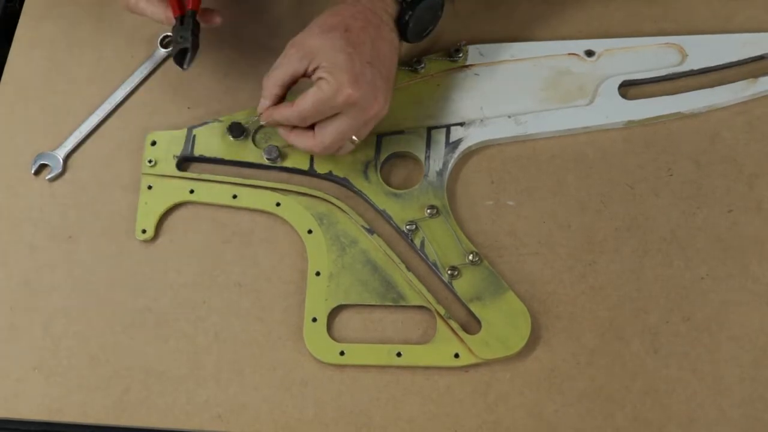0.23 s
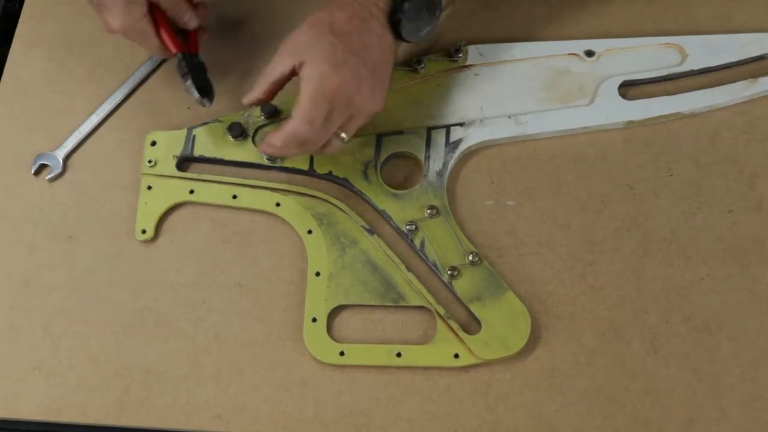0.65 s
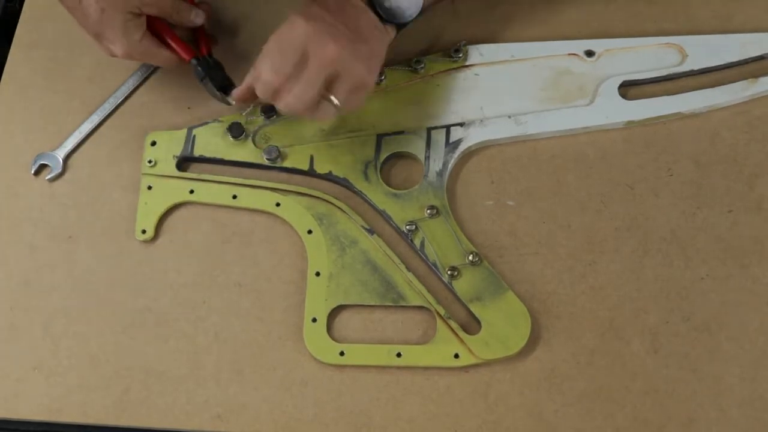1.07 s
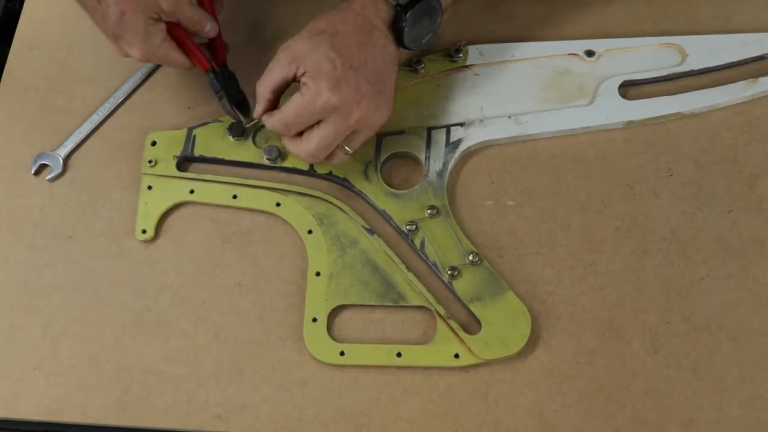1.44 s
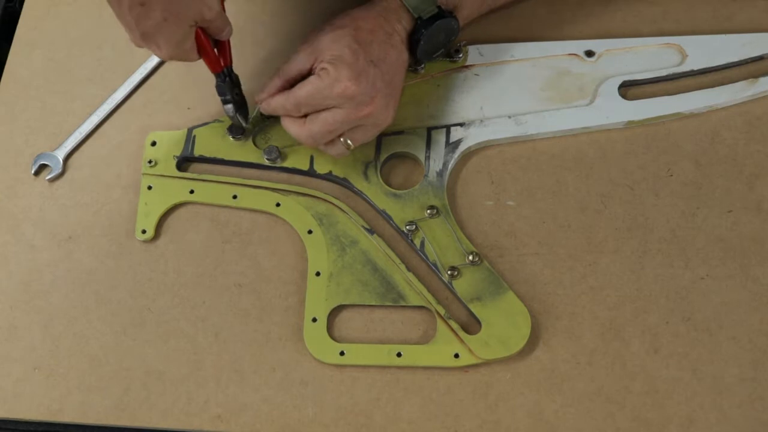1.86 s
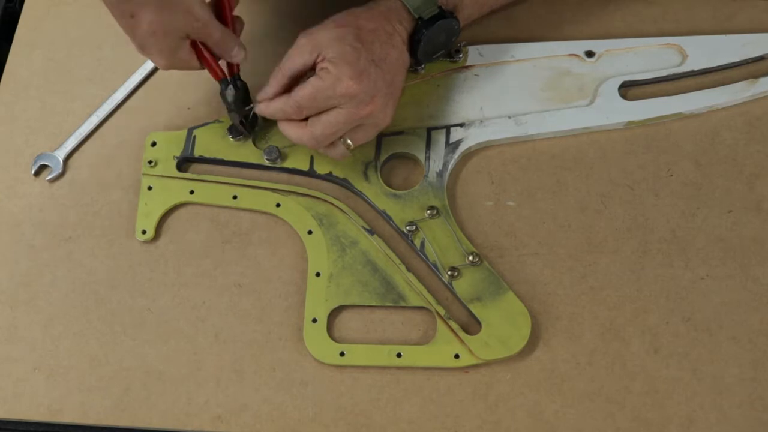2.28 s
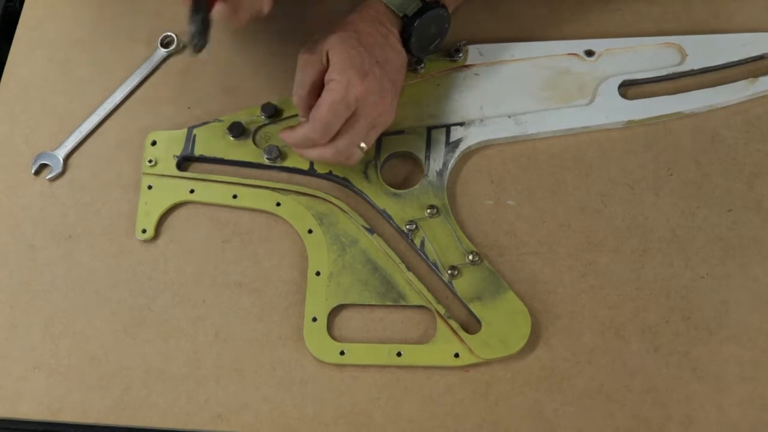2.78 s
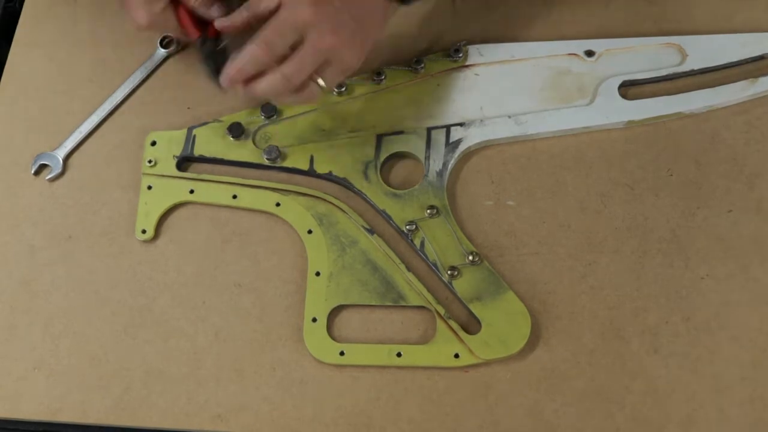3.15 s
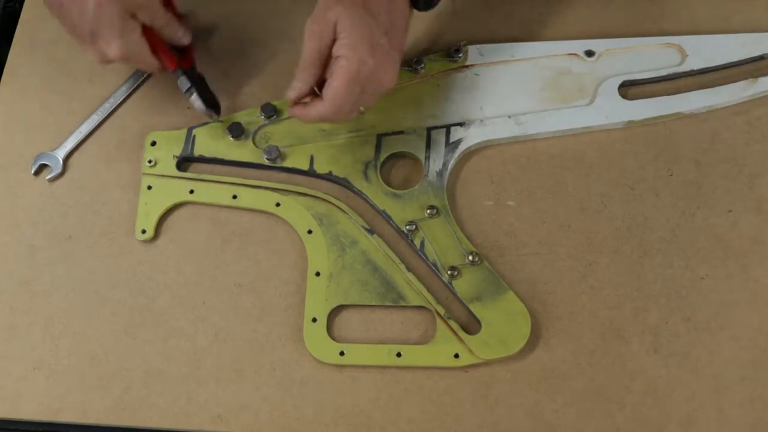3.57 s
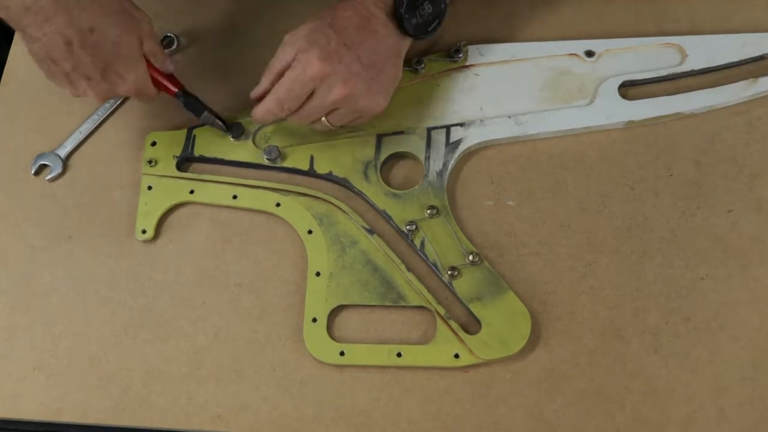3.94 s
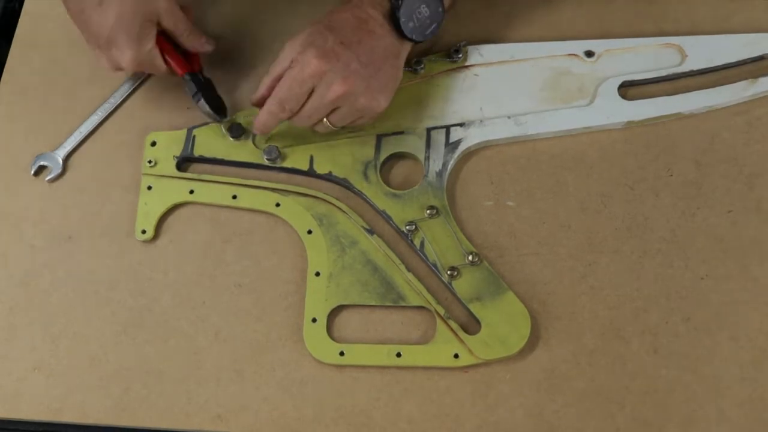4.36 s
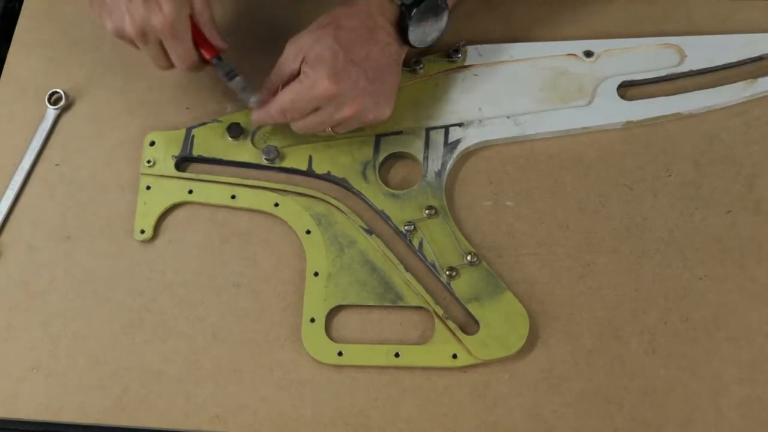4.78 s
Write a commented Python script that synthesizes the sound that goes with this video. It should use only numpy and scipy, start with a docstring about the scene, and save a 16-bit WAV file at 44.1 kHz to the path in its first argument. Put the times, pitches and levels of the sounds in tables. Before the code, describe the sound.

Quiet taps and rubbing of a cutter on a metal plate, one sharp wire snip, a knock, then a spanner clattering on a wooden bench.

```python
"""Over a faint hum and hiss, fingers and cutter jaws tap and rub on a metal plate on a wooden workshop bench.
The locking wire on its bolts squeaks by stick and slip, then parts with one sharp snip: bursts plus ringing modes.
The cutters knock on the plate; a hand shoves a spanner, which slides and clatters over the bench, ringing.
Last, dragged wire rasps and snags. Contacts are bursts of coloured noise, friction is a hail of tiny catches;
all of the bench work is heard with early and diffuse reflections."""
import sys
import numpy as np
from scipy import signal
from scipy.fft import rfft, irfft, next_fast_len
from scipy.io import wavfile
from scipy.ndimage import uniform_filter1d

SR = 44100
rng = np.random.default_rng(int(sys.argv[2]) if len(sys.argv) > 2 else 0)


def generate_wav(signal):
    """Clip the signal to [-1, 1] and save it as 16-bit WAV at the path in sys.argv[1]."""
    frames = np.transpose(np.atleast_2d(signal))
    scaled = np.clip(frames, -1, 1) * 32767
    pcm = np.round(scaled).astype(np.int16)
    wavfile.write(sys.argv[1], SR, pcm)


N = 221117
TIME = np.arange(N) / SR
BLOW_TIME = TIME[:SR // 5]
BLOW_HZ = np.maximum(np.fft.rfftfreq(len(BLOW_TIME), 1 / SR), 1)

# Frequency bands of the diffuse reflections, wider towards the treble.
EDGES = np.geomspace(560, 18000, 33) - 500
CENTRES, WIDTHS = np.sqrt(EDGES[1:] * EDGES[:-1]), np.diff(EDGES)
BANDS = [signal.butter(2, pair, "band", fs=SR, output="sos") for pair in zip(EDGES, EDGES[1:])]

# Mode tables give the t60 before a function's damping divides it; colours give relative level per Hz.
# Landing of the shoved spanner. Each row: start in seconds, level in dB.
CLATTER = [(4.4185, -19.5), (4.4206, -26.5), (4.432, -26)]
# Resonances of the metal plate. Each row: frequency in Hz, relative level in dB, t60 in seconds.
PLATE_MODES = [(159.9, 1, 0.3), (322.2, 0.5, 0.47), (605, -5.5, 0.4), (733, -4.5, 0.47), (947, -5.5, 0.6),
               (1059, -4, 0.35), (1868, -1, 0.22), (2180, -13.5, 0.3), (2900, -9.5, 0.34),
               (3290, -15.5, 0.3), (3990, -8, 0.41), (4170, -8, 0.45), (5530, -6.5, 0.38)]
# Hands leaning on plate and bench. Each row: start in seconds, level in dB.
THUMPS = [(1.443, -57), (1.489, -52.5), (1.515, -50.5), (1.617, -42), (1.912, -49.5), (2.228, -42.5),
          (2.3, -49.5), (2.498, -45), (4.061, -40.5), (4.096, -45), (4.371, -37), (4.775, -45)]
# Spectrum of wire dragged through the jaws. Each row: frequency in Hz, level per Hz in dB.
DRAG_COLOUR = [(59, -36), (120, -9), (335, -5), (502, -14), (720, -1), (900, -11.5), (1330, -17),
               (1720, -12), (2370, -20.5), (3120, -15), (4200, -13.5), (5200, -19.5), (7500, -17),
               (10000, -22.5), (16000, -36)]


def from_db(db):
    """The decibel law for amplitudes: 20 dB is a factor of ten."""
    return 10 ** (np.asarray(db) / 20)


def unit(x):
    """Energy is the sum of squares; here it is scaled to 1."""
    return x / np.sqrt(np.sum(x ** 2) + 1e-30)


def rms_one(x):
    """Mean power is energy over length; here it is scaled to 1."""
    return unit(x) * np.sqrt(len(x))


def per_band(points):
    """Interpolation on a logarithmic frequency axis: a (Hz, value) table read at the band centres."""
    hz, value = np.transpose(points)
    return np.interp(np.log(CENTRES), np.log(hz), value)


def gain_at(colour, f):
    """Spectral envelope: a (Hz, dB) table as gains at frequencies f, falling away below its first point."""
    hz, db = np.transpose(colour)
    return from_db(np.interp(np.log(f), np.log(hz), db)) * np.minimum(f / hz[0], 1) ** 2


def add(out, s, sound):
    """Superposition: mixes a sound in at time s."""
    at = max(round(s * SR), 0)
    out[at:at + len(sound)] += sound[:max(N - at, 0)]


def drift(per_s, t):
    """Slow random fluctuation: straight lines between normal random values of unit spread."""
    knots = rng.standard_normal(2000)
    return np.interp(t * per_s, np.arange(len(knots)), knots)


def causal(gain):
    """Minimum phase by folding the cepstrum: nothing sounds before the contact."""
    cepstrum = irfft(np.log(gain + 1e-9))
    half = len(cepstrum) // 2
    cepstrum[1:half] *= 2
    cepstrum[half + 1:] = 0
    return np.exp(rfft(cepstrum))


def coloured(excitation, colour):
    """Linear filtering: a steady excitation takes on a spectrum; rms 1."""
    size = next_fast_len(N)
    gain = gain_at(colour, np.maximum(np.fft.rfftfreq(size, 1 / SR), 1))
    return rms_one(irfft(rfft(excitation, size) * gain, size)[:N])


def catches(per_s, spread_db):
    """Dry friction as shot noise: a hail of tiny catches of uneven size."""
    sizes = from_db(spread_db * np.minimum(rng.exponential(1, N), 4)) * rng.standard_normal(N)
    return sizes * (rng.random(N) < per_s / SR)


def stroke(s, length_s, attack_s, release_s):
    """Sliding speed: it rises linearly, holds until length_s and decays exponentially."""
    age = TIME - s
    return np.clip(age / attack_s, 0, 1) * np.exp(-np.clip((age - length_s) / release_s, 0, 30))


def blow(gain, t60, evenness_hz=350):
    """Impulsive excitation: a burst of decaying noise with the object's colour; rms 1 if packed into 4 ms."""
    burst = rfft(rng.standard_normal(len(BLOW_TIME)) * from_db(-60 * BLOW_TIME / max(t60, .004)))
    # Dividing by the burst's own smoothed spectrum leaves the wanted colour.
    local = np.sqrt(uniform_filter1d(np.abs(burst) ** 2, int(evenness_hz / BLOW_HZ[1])))
    return np.sqrt(SR / 250) * unit(irfft(burst * causal(gain / local)))


def impacts(contacts, colour, t60):
    """Contact duration limits bandwidth: each blow falls off above its own brightness limit."""
    out = np.zeros(N)
    for s, db, limit_hz in contacts:
        gain = gain_at(colour, BLOW_HZ) / np.hypot(1, (BLOW_HZ / limit_hz) ** 2)
        add(out, s, from_db(db) * blow(gain, t60))
    return out


def dulled(contacts, limit_hz, dulling):
    """Softer contacts last longer, so lose treble: dulling is octaves per 6 dB below the hardest."""
    hardest = max(db for _, db in contacts)
    return [(s, db, limit_hz * from_db(dulling * (db - hardest))) for s, db in contacts]


def ringing(contacts, modes, damping, longest_s=0.6):
    """Modal synthesis: contacts excite two-pole resonators, whose t60 is capped and divided by damping."""
    clicks, out = np.full(N, 1e-18), np.zeros(N)
    for s, db, *_ in contacts:
        add(clicks, s, from_db([db]))
    for k, (hz, db, t60) in enumerate(modes):
        r = from_db(-60 * damping / (min(t60, longest_s) * SR))
        w = 2 * np.pi * hz / SR
        rung = signal.lfilter([0, np.sin(w)], [1, -2 * r * np.cos(w), r * r], clicks)
        out += (-1) ** k * from_db(db) * rung
    return out


def background():
    """Sums of steady partials and filtered noise: a slowly wavering hum over an even hiss."""
    # Each row: frequency in Hz, relative level in dB.
    partials = [(73.3, 0.5), (146.3, -1.5), (291.5, -11), (372, -13), (495.3, -12.5)]
    # Each row: frequency in Hz, level per Hz in dB.
    hiss_colour = [(35, -27), (60, -14.5), (149, 1), (193, -5), (371, -6.5), (666, -10.5), (1060, -12),
                   (2470, -16), (4030, -16.5), (14600, -27.5), (16000, -31)]
    hum_db, waver_db, wavers_per_s, hiss_db = -76, 1.5, 1.2, -72.5
    hum = sum(from_db(db) * np.sqrt(2) * np.sin(2 * np.pi * (hz * TIME + rng.random())) for hz, db in partials)
    swell = from_db(hum_db + waver_db * drift(wavers_per_s, TIME))
    return swell * hum + from_db(hiss_db) * coloured(rng.standard_normal(N), hiss_colour)


def dying_noise(gains, t60s, t):
    """High modal density sounds as noise: each band starts at once and decays at its own rate."""
    white = rng.standard_normal((len(BANDS), len(t)))
    fades = from_db(np.maximum(-60 * t / np.maximum(t60s, .002)[:, None], -200))
    return sum(g * unit(signal.sosfilt(sos, w)) for g, sos, w in zip(gains, BANDS, white * fades))


def evened(response, narrow_hz=70, wide_hz=400):
    """A diffuse field favours no single pitch: above the bass, narrow peaks and dips are levelled."""
    spectrum = rfft(response)
    hz = np.fft.rfftfreq(len(response), 1 / SR)
    power = np.abs(spectrum) ** 2
    narrow, wide = (np.abs(uniform_filter1d(power, int(width / hz[1]))) + 1e-9 for width in (narrow_hz, wide_hz))
    diffuse = np.clip(hz / wide_hz - .5, 0, 1)
    return irfft(spectrum * causal((wide / narrow) ** (diffuse / 2)))


def workshop(x, wet_db=-5.5, delay_s=0.011, uneven_db=3.0, clumps_per_s=300):
    """Reverberation by convolution: early reflections, then uneven diffuse ones dying sooner in the treble."""
    # Each row: frequency in Hz, t60 in seconds.
    room_t60 = [(100, 0.85), (250, 0.62), (600, 0.52), (1500, 0.43), (4000, 0.41), (8000, 0.28),
                (15000, 0.19)]
    # Each row: frequency in Hz, level per Hz in dB.
    room_colour = [(100, -10), (170, -2), (240, 2), (450, -1.5), (750, -2.5), (1500, -2), (4000, -3.5),
                   (8000, -8.5), (15000, -10.5)]
    # The bench and nearby things reflect first.
    early_db, early_t60_s, early_delay_s = -13, 0.24, 0.004
    t, response = TIME[:SR], np.zeros(2 * SR)
    gains = from_db(per_band(room_colour)) * np.sqrt(2 * WIDTHS / SR)
    clumps = rms_one(from_db(uneven_db * drift(clumps_per_s, t)))
    early = dying_noise(gains, np.full(len(BANDS), early_t60_s), BLOW_TIME)
    add(response, early_delay_s, from_db(early_db) * early)
    add(response, delay_s, from_db(wet_db) * clumps * dying_noise(gains, per_band(room_t60), t))
    return signal.fftconvolve(x, evened(response))[:N]


def hand_effort():
    """Contact load and sliding speed shape friction: pressure and friction of all rubs as gains in time."""
    # Fingers and tool rub over the plate; the first row is only a brief rush of noise fading at the very start.
    # Each row: start in seconds, length in seconds, pressure rumble in dB and friction in dB, both before the
    # trims in rubbing().
    rubs = [(0.0, 0.012, -63.5, -71), (0.506, 0.11, -77, -66.5), (0.726, 0.2, -80, -85),
            (1.325, 0.44, -78, -68), (1.881, 0.045, -63, -79), (1.999, 0.11, -55.5, -72.5),
            (2.169, 0.11, -54, -67), (2.331, 0.17, -64, -66.5), (2.472, 0.079, -55.5, -61),
            (2.555, 0.11, -60, -63.5), (3.878, 0.24, -63.5, -69.5), (4.333, 0.036, -52, -60),
            (4.715, 0.053, -57.5, -60.5)]
    attack_s, release_s = 0.022, 0.04
    shapes = [(stroke(s, length, attack_s, release_s), press, drag) for s, length, press, drag in rubs]
    pressure = np.max([shape * from_db(db) for shape, db, _ in shapes], axis=0)
    friction = np.max([shape * from_db(db) for shape, _, db in shapes], axis=0)
    return pressure, friction


def rubbing(pressure, friction, rumble_db=-3, friction_db=-7.5, unsteady_db=3):
    """Rough surfaces excite by friction: skin and wire catch on the plate, over the rumble of the bench."""
    # Both colours, each row: frequency in Hz, level per Hz in dB.
    friction_colour = [(200, -12), (450, -5), (1100, 2.5), (2300, -4.5), (4500, -3.5), (8000, -16),
                       (16000, -43.5)]
    rumble_colour = [(53, -31), (90, -6.5), (180, -3.5), (230, 3), (290, -9.5), (371, -1), (444, -10.5),
                     (700, -15), (1100, -16.5), (1600, -35), (3000, -78.5)]
    grains = coloured(catches(per_s=2300, spread_db=3.0), friction_colour)
    bench = coloured(rng.standard_normal(N), rumble_colour)
    unsteady = from_db(unsteady_db * drift(55, TIME))
    rumble = from_db(rumble_db) * pressure * bench
    return unsteady * (rumble + from_db(friction_db) * friction * grains)


def thumps(t60=0.039):
    """A soft, slow contact excites only low frequencies: weight on the bench gives mainly bass."""
    # Each row: frequency in Hz, level per Hz in dB.
    thump_colour = [(60, -24), (110, -2.5), (170, 3.5), (240, -4), (400, -17.5), (900, -23.5), (3000, -45),
                    (16000, -88)]
    out = np.zeros(N)
    for s, db in THUMPS:
        add(out, s, from_db(db) * blow(gain_at(thump_colour, BLOW_HZ), t60))
    return out


def grazes(friction, count=70):
    """Asperities meet by chance: faint touches at random moments, following the friction; rows like taps."""
    # Level above the friction gain, its spread, and the edge of bare steel, before the trims in taps().
    above_db, spread_db, mean_hz, edge_db = 6, 3.5, 1200, -5
    out = []
    for k, (when, size, spot) in enumerate(rng.random((count, 3))):
        at = int((k + when) / count * N)
        db = 20 * np.log10(friction[at] + 1e-9) + above_db + spread_db * (2 * size - 1)
        out.append((at / SR, db, mean_hz * 2 ** (2 * spot - 1), edge_db))
    return out


def taps(touches, level_db=-2.0, bass_db=-2, treble_db=2.5, resonance_db=6, resonance_octaves=0.51):
    """Force adds weight and damping, bare steel adds edge; each spot of the plate favours its own pitch."""
    # Each row: frequency in Hz, level per Hz in dB.
    tap_colour = [(90, -5.5), (170, 5), (350, 8), (700, 7.5), (1100, 5), (1700, -4), (2700, -2.5),
                  (4200, 6), (6000, -3), (9000, -4.5), (16000, -35.5)]
    firm_db, bass_loss = -36, 1  # a firm tap moves the whole plate; dB of bass lost per dB lighter
    firm_t60_s, grip_db = 0.042, 20.5  # decay of a firm tap's burst; pressing this much harder halves it
    out = np.zeros(N)
    for s, db, hz, edge_db in touches:
        lightness = np.clip(firm_db - db, -10, 20)
        bass = db + bass_db - bass_loss * max(lightness, 0)
        resonance = np.exp(-(np.log2(BLOW_HZ / hz) / resonance_octaves) ** 2)
        spot = gain_at(tap_colour, BLOW_HZ) * from_db(resonance_db * resonance)
        weights = [(60, bass), (280, bass), (550, db), (1900, db), (3800, db + edge_db + treble_db)]
        gain = unit(spot) * gain_at(weights, BLOW_HZ)
        burst = blow(unit(gain), firm_t60_s * 2 ** (lightness / grip_db))
        add(out, s, from_db(level_db) * np.linalg.norm(gain) * burst)
    return out + from_db(-34) * ringing(touches, PLATE_MODES, damping=1.3, longest_s=.4)


def wire(tick_db=-3):
    """A light, thin body responds in the treble: the wire ticks, pings when flicked and rasps when dragged."""
    # Loose wire against steel. Each row: start in seconds, level in dB before tick_db, t60 in seconds.
    ticks = [(2.1334, -67, 0.015), (2.259, -70, 0.012), (2.306, -65, 0.012), (2.5303, -57, 0.049),
             (3.3041, -50.5, 0.041), (4.3985, -44, 0.019), (4.7318, -41.5, 0.01), (4.738, -53, 0.01)]
    # Each row: frequency in Hz, level per Hz in dB.
    tick_colour = [(90, -37), (1500, -17), (3700, -2), (4800, -13), (7300, 0), (9200, -16), (11500, -10.5),
                   (16000, -25.5)]
    # A flicked end of wire. Each row: start in seconds, frequency in Hz, level in dB, t60 in seconds.
    pings = [(0.331, 2830, -63.5, 0.13), (0.55, 2700, -68, 0.12), (1.191, 2716, -60.5, 0.11),
             (2.004, 5520, -52.5, 0.024), (2.086, 4190, -58, 0.04), (3.305, 7620, -49, 0.022),
             (3.311, 6900, -47.5, 0.018), (4.843, 6950, -50, 0.018)]
    drag_s, drag_length_s, drag_db = 4.768, 0.02, -47.5  # the wire is drawn through the jaws
    speed = stroke(drag_s, drag_length_s, attack_s=0.009, release_s=0.018)
    out = from_db(drag_db) * speed * coloured(catches(per_s=4000, spread_db=3.0), DRAG_COLOUR)
    for s, db, t60 in ticks:
        add(out, s, from_db(db + tick_db) * blow(gain_at(tick_colour, BLOW_HZ), t60))
    for s, hz, db, t60 in pings:
        add(out, s, from_db(db - 60 * BLOW_TIME / t60) * np.sin(2 * np.pi * hz * BLOW_TIME))
    return out


def snags(ring_db=-21, t60=0.016):
    """Impulses excite free modes: twists of dragged wire catch in turn and set its free length jingling."""
    # Twists catching on the jaws. Each row: start in seconds, level in dB before the trims below.
    twists = [(4.7738, -40), (4.7814, -34.5), (4.789, -39), (4.7988, -42)]
    # The free length of wire. Each row: frequency in Hz, relative level in dB, t60 in seconds.
    wire_modes = [(1733, -4, 0.4), (3455, -5, 0.35), (4160, -2.5, 0.22), (4624, -2.5, 0.24),
                  (6374, -3.5, 0.27), (6912, -4, 0.25), (8107, -8, 0.22), (9426, -3, 0.24)]
    out = from_db(ring_db) * ringing(twists, wire_modes, damping=1.3)
    for s, db in twists:
        add(out, s, from_db(db - 5) * blow(gain_at(DRAG_COLOUR, BLOW_HZ), t60))
    return out


def squeaks(overtone_db=-17, stutter_db=3.0):
    """Stick-slip oscillation of wire on steel: a short unsteady tone with its octave."""
    # Each row: start in seconds, length in seconds, starting frequency in Hz, level in dB.
    slips = [(2.331, 0.012, 861, -46.5), (2.338, 0.014, 660, -50), (2.343, 0.012, 4900, -58),
             (2.401, 0.01, 4630, -59), (2.412, 0.011, 4750, -57.5), (2.44, 0.009, 4680, -63.5),
             (2.477, 0.016, 4920, -63.5), (2.52, 0.01, 5270, -54.5), (2.534, 0.011, 5300, -54.5),
             (4.3825, 0.0042, 3920, -39.5), (4.3987, 0.003, 3790, -28)]
    sag_hz_per_s = 3500  # the pitch sinks as a slip slows
    waver = 0.015  # share of the pitch
    out = np.zeros(N)
    for s, length, hz, db in slips:
        t = TIME[:int(length * SR)]
        pitch = (hz - sag_hz_per_s * t) * (1 + waver * drift(970, t))
        phase = 2 * np.pi * np.cumsum(pitch) / SR
        swell = np.sin(np.pi * (t / length) ** 0.69) * rms_one(from_db(stutter_db * drift(350, t)))
        add(out, s, from_db(db) * swell * (np.sin(phase) + from_db(overtone_db) * np.sin(2 * phase)))
    return out


def scrapes(swell_skew=0.5):
    """A moving contact shifts the resonance it drives: a run of catches rings at a gliding pitch."""
    # Steel over steel. Each row: start in seconds, length in seconds, starting resonance in Hz,
    # its glide in octaves, level in dB.
    passes = [(1.958, 0.012, 1000, -1.5, -65), (2.024, 0.043, 405, 0.2, -59),
              (2.034, 0.03, 1180, 0.29, -65), (2.085, 0.015, 1680, -0.62, -62.5),
              (2.185, 0.016, 1610, -0.1, -62.5), (2.215, 0.04, 452.5, -0.17, -57),
              (2.497, 0.014, 622.6, -1.3, -56.5), (2.517, 0.035, 450.4, 0.38, -59.5),
              (2.607, 0.031, 1197, -0.45, -59), (4.154, 0.02, 3180, -0.5, -62),
              (4.389, 0.02, 1145, -0.033, -47.5), (4.737, 0.053, 1030, -0.07, -56.5),
              (4.769, 0.044, 780, 0.28, -50.5)]
    relative_width = 0.2  # resonance width as a share of its starting pitch
    out, grains = np.zeros(N), catches(per_s=2500, spread_db=0.0)
    for s, length, hz, glide, db in passes:
        t = TIME[:int(length * SR)]
        turn = np.exp(2j * np.pi * np.cumsum(hz * 2 ** (glide * t / length)) / SR)
        r = np.exp(-np.pi * relative_width * hz / SR)
        drive = grains[int(s * SR):][:len(t)]
        # A one-pole filter in the rotating frame resonates at the gliding pitch.
        rung = np.real(turn * signal.lfilter([1], [1, -r], drive / turn))
        rung = signal.sosfilt(signal.butter(2, 2 * hz, fs=SR, output="sos"), rung)
        add(out, s, from_db(db) * rms_one(rung * np.sin(np.pi * (t / length) ** swell_skew)))
    return out


def bench_top(bounces):
    """Structure-borne sound: the wooden top drums under the spanner and under the weight of the hands."""
    # Each row: frequency in Hz, relative level in dB, t60 in seconds.
    bench_modes = [(205, -16.5, .45), (246.9, 4, 0.8), (365, -3, 0.45)]
    struck = from_db(-23.5) * ringing(bounces, bench_modes, damping=1.9, longest_s=0.94)
    return struck + from_db(-26.0) * ringing(THUMPS, bench_modes, damping=2.0, longest_s=0.98)


def sizzle():
    """Dense micro-impacts merge into noise: the settling spanner chatters in a bright metallic wash."""
    # Buzz of the spanner's ends on the bench. Each row: frequency in Hz, level per Hz in dB.
    sizzle_colour = [(3000, -12), (5000, 7.5), (7000, 3.5), (8300, 1), (10000, -7), (12000, -5),
                     (13000, -14), (16000, -15)]
    motion = stroke(CLATTER[0][0], length_s=0.036, attack_s=0.028, release_s=0.082)
    return from_db(-56) * motion * coloured(catches(per_s=8000, spread_db=2.5), sizzle_colour)


def rattle(count=11, uneven=0.15, uneven_db=-0.5):
    """Energy lost at each impact: the landed spanner rocks in ever weaker, sparser bounces (s, dB)."""
    first_db, fall_db = -28, 4  # typical first bounce; loss per doubling of time
    first_gap_s, widening = 0.0075, 1.15  # typical first gap; growth from gap to gap
    chance = rng.standard_normal((count, 2))
    gaps = first_gap_s * widening ** np.arange(count) * np.exp(uneven * chance[:, 0])
    ages = np.cumsum(gaps)
    levels = first_db - fall_db * np.log2(ages / ages[0]) + uneven_db * chance[:, 1]
    return list(zip(CLATTER[-1][0] + ages, levels))


def spanner(bounces):
    """Sliding friction, then impacts on modes: the spanner bounces and its first hit makes the steel sing."""
    # Both colours, each row: frequency in Hz, level per Hz in dB.
    slide_colour = [(150, 10), (300, -0.5), (600, 3), (1150, 7), (2000, -12), (3000, -8), (3900, -9),
                    (5500, -11.5), (9000, -27), (16000, -39)]
    clatter_colour = [(70, -39), (150, -18.5), (250, -5), (370, -6.5), (480, -9.5), (650, -9.5), (800, -4),
                      (1040, -8), (1250, -5.5), (1500, -12), (1900, -6), (2750, -13), (3700, -9),
                      (7800, -31), (16000, -55)]
    # The spanner on the bench top, then its thin overtones. Each row: frequency in Hz,
    # relative level in dB, t60 in seconds.
    spanner_modes = [(650, -5, 0.55), (754, -4.5, 0.49), (896, -12, 0.32), (1222, -7, 0.5), (1280, -1, 0.3),
                     (1860, -4, 0.37), (1890, -2, 0.47), (2476, -8, 0.3), (3278, -8, 0.3),
                     (3370, -13, 0.34), (3570, -13, 0.45), (3838, -7, 0.39), (4382, -15, 0.32)]
    steel_ring = [(4705, 6.5, 0.85), (5243, -3, .5), (5959, -2, .36), (6670, -3, .34), (8258, 11, 0.29),
                  (11477, -6, 0.55), (12204, -6, 0.55), (13749, -11, 0.7), (15340, -13, 0.55)]
    slide_s, slide_length_s, slide_db = 4.373, 0.044, -42.5  # it slides before it tips
    speed = stroke(slide_s, slide_length_s, attack_s=0.01, release_s=0.0028)
    slide = from_db(slide_db) * speed * coloured(catches(per_s=5000, spread_db=2.0), slide_colour)
    body = from_db(-28.0) * ringing(bounces, spanner_modes, damping=0.97, longest_s=1.0)
    steel = from_db(-43) * ringing(bounces[:1], steel_ring, damping=1, longest_s=.9)
    hits = impacts(dulled(bounces, limit_hz=13400, dulling=0.89), clatter_colour, t60=0.033)
    return slide + hits + body + steel


def knock():
    """Impact on a resonant plate: the cutters bump it, and it thuds and rocks on the bench."""
    # Cutters set down on the plate. Each row: start in seconds, level in dB.
    bumps = [(3.6638, -23), (3.6668, -26.5), (3.6905, -45), (3.708, -42.5), (3.749, -52), (3.821, -46.5)]
    # Each row: frequency in Hz, level per Hz in dB.
    knock_colour = [(70, -18), (110, -18), (160, 1), (225, -12.5), (330, 0.5), (480, 2.5), (600, 0),
                    (850, -0.5), (1100, 4), (1350, -10.5), (2100, -6.5), (3600, -20.5), (4300, -13),
                    (5600, -19.5), (7200, -35.5), (10000, -33.5), (16000, -50)]
    thuds = impacts(dulled(bumps, limit_hz=12940, dulling=0.77), knock_colour, t60=0.031)
    return thuds + from_db(-28.0) * ringing(bumps, PLATE_MODES, damping=1.9)


def snip():
    """Sudden release of strain: jaws bite, the wire cracks, the freed plate shudders, held cutters ring."""
    # The jaws bite, the wire parts, the jaws slam shut. Each row: start in seconds, level in dB,
    # brightness limit in Hz.
    cuts = [(2.608, -52, 5895), (2.616, -56, 3945), (2.6465, -18.5, 17280), (2.6495, -23, 3370)]
    # Colours of the contacts, of the fracture itself and of the plate let go by the wire.
    # Each row: frequency in Hz, level per Hz in dB.
    snip_colour = [(70, -18.5), (170, -5), (240, -3), (320, -10), (550, -1), (820, -3), (1050, 0),
                   (1350, -3.5), (2400, -6), (3900, -1), (5500, -5), (9000, -11), (15000, -14.5),
                   (16500, -22)]
    crack_colour = [(3000, -14.5), (6000, -3.5), (9000, 0), (16000, -9)]
    shudder_colour = [(100, -13), (220, -7.5), (350, -7), (590, 4), (760, -3), (1080, 3), (1500, -7.5),
                      (2200, -7), (3800, -6), (6000, -15.5), (16000, -29)]
    # Each row: frequency in Hz, relative level in dB, t60 in seconds.
    cutter_modes = [(1354, -0.5, 0.4), (1604, 1, 0.27), (1880, -5.5, 0.3), (2380, -3.5, 0.3),
                    (3338, -3.5, 0.3), (3580, -1.5, 0.33), (4253, -3, 0.28), (4700, -6, 0.26),
                    (5491, -5.5, 0.28), (5900, -8.5, 0.33), (6900, -9, 0.2), (9930, -8, 0.14)]
    crack_db, crack_t60_s = -27, 0.0066
    shudder_db, shudder_t60_s = -27, 0.12
    jaws = impacts(cuts, snip_colour, t60=0.023)
    out = jaws + from_db(-29) * ringing(cuts, cutter_modes, damping=2.1, longest_s=.35)
    shudder = from_db(shudder_db) * blow(gain_at(shudder_colour, BLOW_HZ), shudder_t60_s)
    add(out, cuts[-1][0], shudder)
    # The fracture falls on the loudest contact.
    loudest = max(cuts, key=lambda row: row[1])
    add(out, loudest[0], from_db(crack_db) * blow(gain_at(crack_colour, BLOW_HZ), crack_t60_s))
    return out


def scene():
    """Direct sound, reflections and background superpose."""
    # Jaws and wire touch the plate. Each row: start in seconds, level in dB, main resonance in Hz,
    # edge of bare steel in dB; levels and edge are before the trims in taps().
    touches = [(0.33, -45.5, 1280, -7.5), (0.548, -57, 2790, -3.5), (0.589, -50, 444, -15),
               (0.767, -55.5, 1170, -14.5), (0.875, -62, 1200, -6), (0.896, -51, 1440, -15.5),
               (1.189, -52.5, 2260, -14), (1.441, -57.5, 710, -2.5), (1.608, -47, 760, -8.5),
               (1.902, -50, 420, -8.5), (2.002, -47.5, 400, -9), (2.086, -48.5, 940, -14.5),
               (2.134, -50.5, 1100, -21), (2.179, -49.5, 900, -26), (2.331, -41, 800, -28),
               (2.516, -46.5, 464, -30.5), (3.8655, -35, 1120, -15.5), (3.8685, -27.5, 1180, -28.5),
               (3.965, -36.5, 704, -20.5), (4.054, -40.5, 723, -23), (4.084, -38.5, 810, -13),
               (4.128, -31.5, 1006, -37.5), (4.325, -47, 890, -17), (4.728, -37, 890, -6.5),
               (4.913, -43.5, 1274, -22)]
    bounces = list(CLATTER) + rattle()
    pressure, friction = hand_effort()
    handling = taps(list(touches) + grazes(friction)) + rubbing(pressure, friction) + thumps()
    handling = handling + wire() + snags() + squeaks() + scrapes()
    work = snip() + knock() + spanner(bounces) + sizzle() + bench_top(bounces) + handling
    return (work + workshop(work) + background())[None]


def record(dry):
    """Band limiting: a steep elliptic low-pass cuts the top above 16.2 kHz."""
    return signal.sosfilt(signal.ellip(10, .1, 80, 16200, fs=SR, output="sos"), dry)


dry = scene()
out = record(dry)
generate_wav(out)
```